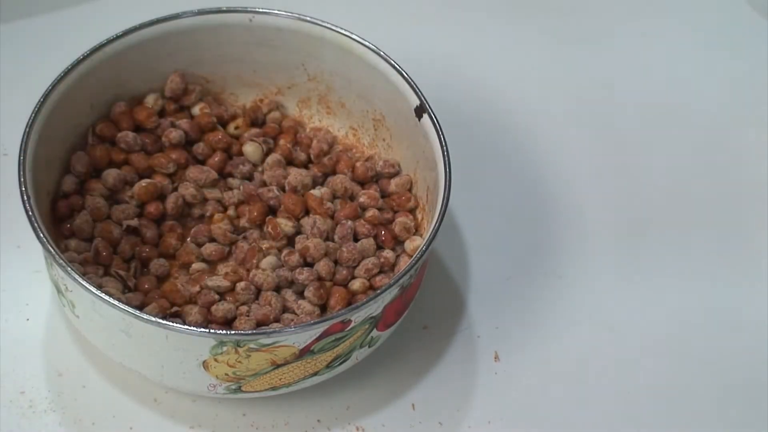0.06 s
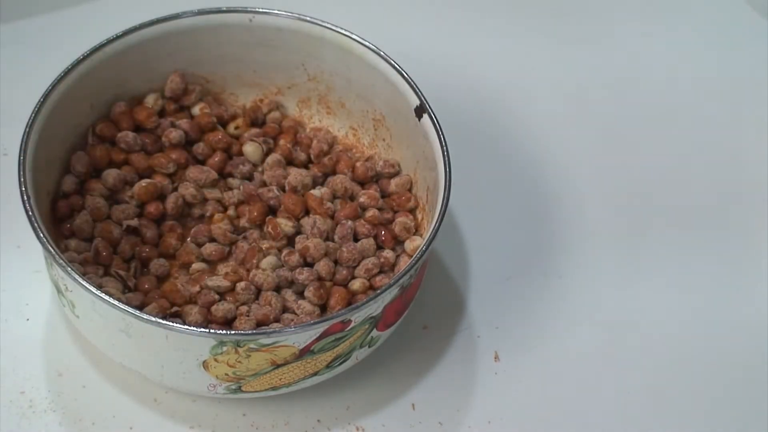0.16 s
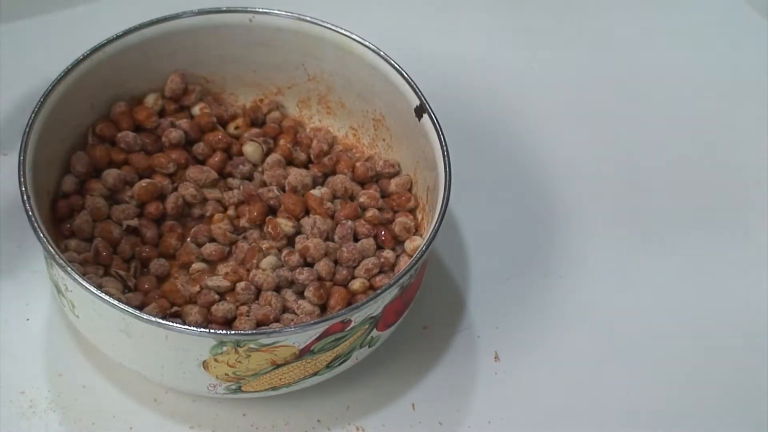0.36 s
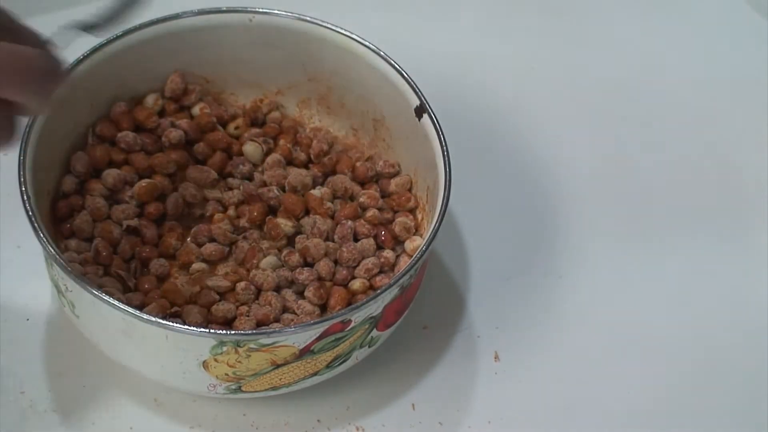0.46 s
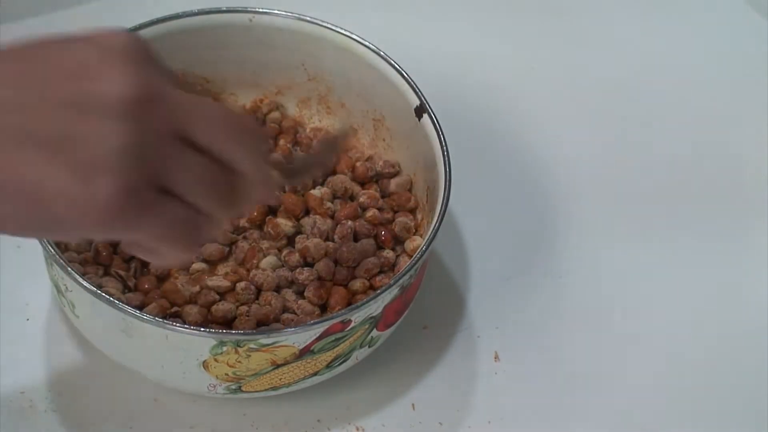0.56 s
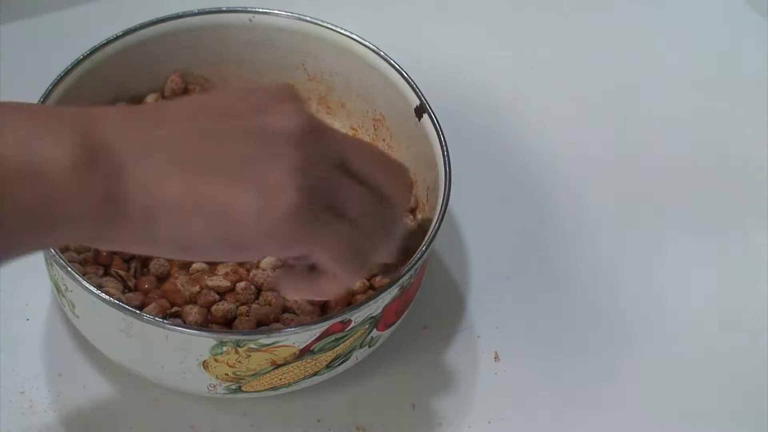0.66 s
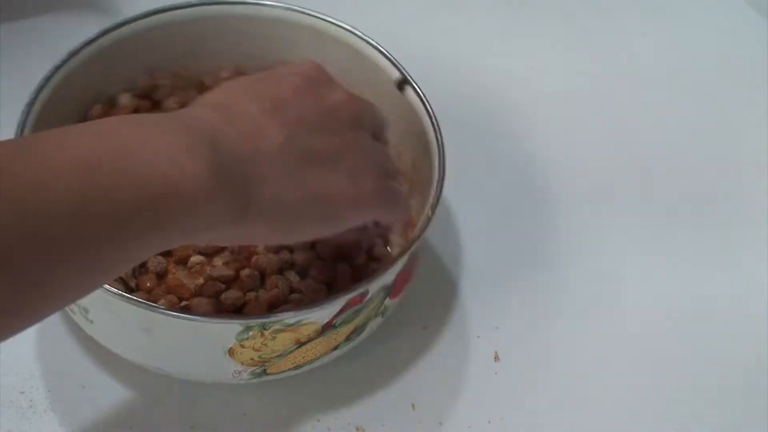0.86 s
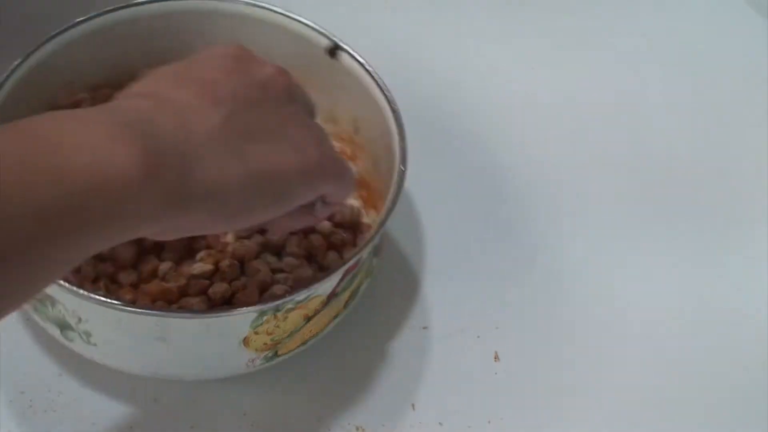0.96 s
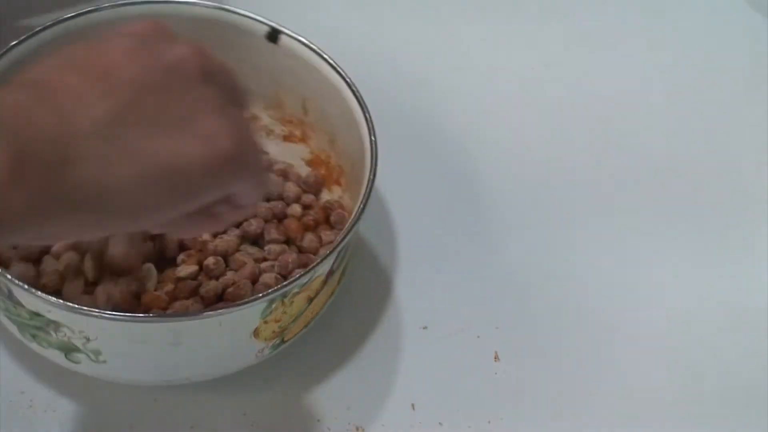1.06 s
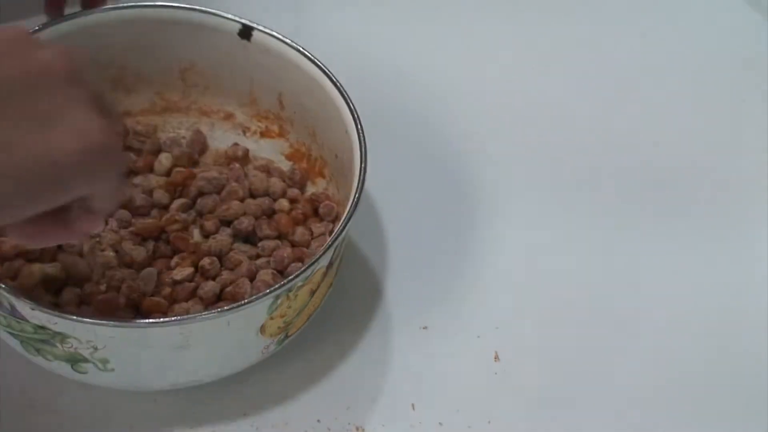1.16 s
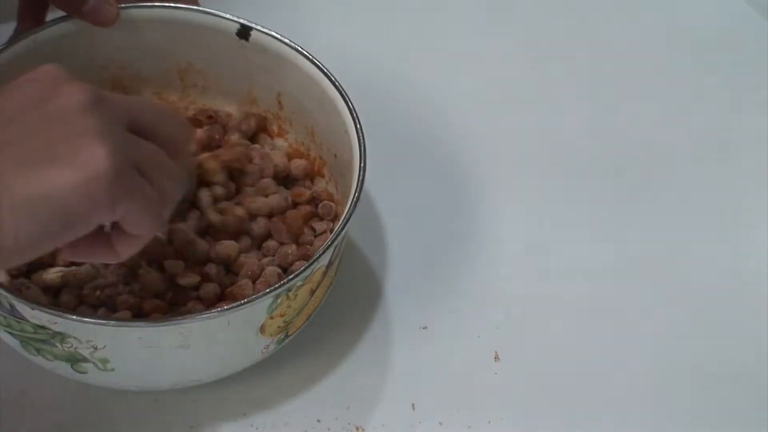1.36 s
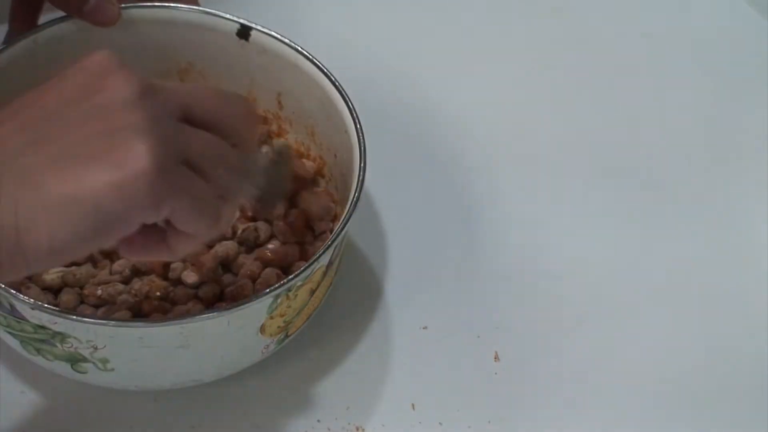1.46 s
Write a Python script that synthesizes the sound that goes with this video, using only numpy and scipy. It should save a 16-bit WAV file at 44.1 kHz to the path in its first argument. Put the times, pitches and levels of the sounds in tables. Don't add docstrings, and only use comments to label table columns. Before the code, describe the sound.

Coated peanuts are stirred in an enamel bowl with crunchy scrapes and small ticks, after a quick flurry of steel cutlery clinks and a loud wooden knock that bounces; small quiet kitchen, close stereo microphones.

```python
import sys
import numpy as np
from scipy import signal
from scipy.fft import rfft, irfft, next_fast_len
from scipy.io import wavfile
from scipy.ndimage import uniform_filter1d, map_coordinates

SR = 44100
rng = np.random.default_rng(int(sys.argv[2]) if len(sys.argv) > 2 else 0)


def wrap_up_sound(samples):
    columns = np.atleast_2d(samples).T
    tamed = np.clip(columns, -1, 1)
    steps = np.round(tamed * 32767).astype(np.int16)
    wavfile.write(sys.argv[1], SR, steps)


def makeup_ratio(level_db):
    decades = np.asarray(level_db, float) / 20
    return 10 ** decades


N = 66150
T = np.arange(N) / SR
LEAD = 4096


def noise(shape=N):
    return rng.standard_normal(shape)


def unit(x):
    return x / np.sqrt(np.mean(x ** 2) + 1e-20)


def along(points, hz):
    f, v = np.transpose(points)
    return np.interp(np.log(hz + 1), np.log(f + 1), v)


def filtered(x, response):
    n = x.shape[-1]
    m = next_fast_len(n + SR // 4)
    return irfft(rfft(x, m) * response(np.fft.rfftfreq(m, 1 / SR)), m)[..., :n]


def causal(points, tilt_db=0):
    def response(hz):
        level_db = along(points, hz) + tilt_db * np.log2((hz + 200) / 1200)
        c = irfft(np.log(makeup_ratio(level_db) + 1e-6))
        c[1:len(c) // 2] *= 2
        c[len(c) // 2 + 1:] = 0
        return np.exp(rfft(c))
    return response


def peaks(rows):
    def response(f):
        total = 0
        for k, (c, w, db) in enumerate(rows):
            total = total + (-1) ** k * makeup_ratio(db) * 1j * f * w / (c * c - f * f + 1j * f * w + 1e-9)
        return response_type(total)
    response_type = np.asarray
    return response


def wobble(rate):
    return map_coordinates(noise(2000), [np.arange(N) * rate / SR])


def grains(rate, spread_db):
    chance, sign, size = rng.random((3, N))
    return (chance < rate / SR) * np.sign(sign - .5) * makeup_ratio(-spread_db * np.log(size + 0.00099))


def add(track, s, x):
    part = track[..., max(round(s * SR) + LEAD, 0):][..., :x.shape[-1]]
    part += x[..., :part.shape[-1]]


# (frequency [Hz], level [dB])
FLOOR_COLOUR = [(30, -26), (100, -14), (300, -4), (1500, -9.5), (2100, -15), (4800, -23.5), (15700, -35)]


def quiet_kitchen():
    return makeup_ratio(-60.5) * unit(filtered(noise((2, N)), lambda f: makeup_ratio(along(FLOOR_COLOUR, f))))


# (frequency [Hz], time to fall 60 dB [s])
ROOM_DECAY = [(100, 0.37), (400, 0.27), (1500, 0.38), (4000, 0.27), (10000, 0.14)]


def room(x):
    hz, t, z = signal.stft(noise((2, SR // 2)), SR, nperseg=256)
    fade = makeup_ratio(-60 * t / along(ROOM_DECAY, hz)[:, None])
    tail = signal.istft(z * fade, SR, nperseg=256)[1]
    tail = np.pad(tail / np.linalg.norm(tail[0]), ((0, 0), (150, 0)))
    return signal.fftconvolve(x[None], tail * [[1], [.8]], axes=1)


def with_room(x, room_db):
    out = makeup_ratio(room_db) * room(x)
    out[0, :len(x)] += x
    return out


# (frequency [Hz], level [dB])
JANGLE_COLOUR = [(710, -60.5), (1200, -41.5), (1780, -16.5), (2010, -16.5), (2330, -8.5), (2650, -14),
                 (4980, -16), (5790, -21.5), (15500, -42.5)]


def clink(modes, s, db, jangle_db, tilt_db, out):
    fuzz_hz, partner, jangle_t60 = 22.5, 0.00814, 0.086
    t = np.arange(SR // 2) / SR
    hz, level_db, t60 = np.transpose(modes)[:, :, None]
    steps = uniform_filter1d(noise((2, len(modes), len(t))), size=60, axis=-1)
    drift = np.cumsum(steps, -1) * np.sqrt(2 * np.pi * fuzz_hz * (hz + 1200) / 7000 / SR)
    pair = np.sin(2 * np.pi * hz * t + drift[0])
    pair = pair + 0.77 * np.sin(2 * np.pi * hz * (1 + partner) * t + drift[1])
    ring = (makeup_ratio(level_db - 60 * t / t60) * pair).sum(0)
    jangle = unit(filtered(noise(len(t)), causal(JANGLE_COLOUR, tilt_db)))
    jangle = jangle * makeup_ratio(jangle_db - 60 * t / jangle_t60)
    rise_s = 0.02 if jangle_db < -15 else .0006
    touch = makeup_ratio(db - 10.5) * (ring + jangle) * (1 - np.exp(-t / rise_s))
    add(out, s, with_room(touch, -7))


# (frequency [Hz], level [dB], time to fall 60 dB [s])
SERVER_MODES = [(2260, -4.5, 0.39), (3360, -8.5, .3), (3860, -13, 0.24), (3880, -8, 0.27), (5420, -9, 0.17),
                (5744, -2.5, 0.35), (6430, -7.5, 0.26), (10360, -18, 0.13)]
TEASPOON_MODES = [(4520, -5.5, 0.15), (5755, -0.5, 0.18), (8300, -9, 0.14), (9000, 0.5, 0.091),
                  (12168, -12, .06), (12700, -11.5, 0.123)]
FORK_MODES = [(1827, -0.5, 0.27), (2287, -12, 0.25), (3007, -11, 0.18), (3430, -12.5, 0.09),
              (3730, -16.5, 0.22), (5630, -2.5, 0.077), (5737, -4, 0.22), (6010, -2, 0.061),
              (6590, -0.5, 0.11), (10140, -20.5, 0.34), (12170, -22.5, .15), (12880, -21, 0.097)]
KNIFE_MODES = [(2325, -3, 0.25), (3100, -8, 0.11), (3620, -10, .5), (3800, -9, 0.11), (4520, -18.5, 0.1),
               (5560, -16, 0.17), (5670, -6, 0.42), (6180, -4, 0.24), (6420, -6.5, 0.37), (8200, -19, 0.11),
               (10300, -18, 0.08), (11200, -18.5, 0.14)]
# (time [s], peak level [dB], jangle [dB], jangle brightness [dB per octave])
SERVER_TOUCHES = [
    (-.02, -26.5, 5.5, -1),
    (.02, -35.5, 5.4, -.5),
    (.048, -41.5, 6.1, -.5),
]
TEASPOON_TOUCHES = [
    (0.083, -38, -21.5, 3),
    (0.0929, -38.5, -9.5, 3.3),
    (0.0993, -31, -13.5, 3.3),
    (0.1069, -38.5, -12, 2.7),
    (.127, -30, -4.5, 2.1),
]
FORK_TOUCHES = [
    (0.1349, -14.5, -5, 0.86),
    (.14, -26.5, 4.5, 1),
    (.148, -29, 2, .1),
    (0.16, -32.5, 5.5, .1),
    (0.167, -27, 2.5, .1),
]
KNIFE_TOUCHES = [
    (0.2112, -21, -0.5, 1.5),
    (.2205, -27.5, 3.5, 0.5),
    (0.2613, -23, -1.5, 1.5),
]


def cutlery():
    out = np.zeros((2, N + LEAD))
    pieces = [(SERVER_MODES, SERVER_TOUCHES), (TEASPOON_MODES, TEASPOON_TOUCHES),
              (FORK_MODES, FORK_TOUCHES), (KNIFE_MODES, KNIFE_TOUCHES)]
    for modes, touches in pieces:
        for touch in touches:
            clink(modes, *touch, out)
    return filtered(out, lambda f: (1j * f / (1j * f + 790)) ** 4)[:, LEAD:]


def snap(hz, t):
    return np.sin(2 * np.pi * hz * t) * (hz * t) * np.exp(1 - hz * t) * np.exp(-hz * t / 4)


def stopping(t, end_s, fade_s):
    return makeup_ratio(-60 * np.maximum(t - end_s, 0) / fade_s)


# (frequency [Hz], level [dB])
WOOD_COLOUR = [(35, -95.5), (80, -32.5), (360, -7), (1080, -6), (1610, -6), (1910, -8), (2070, -9),
               (6440, -44), (9000, -81), (11700, -63), (19800, -120)]
# (frequency [Hz], level [dB], time to fall 60 dB [s])
BOARD_MODES = [(220, -2.5, 0.1), (428, -16.5, 0.037), (684, -7.5, 0.085), (1190, -15, 0.058),
               (1312, -14, 0.07), (1500, -18.5, .08), (1608, -6.5, 0.072), (2070, -15, 0.077),
               (2790, -10, 0.019)]
# (time [s], snap peak [dB], snap frequency [Hz], narrowing about it [dB per octave squared],
#  rattle lasts [s])
WOOD_KNOCKS = [
    (0.2857, -0.5, 3450, 0.46, 0.12),
    (0.4291, -14, 907, 1.0, 0.093),
    (0.4344, -21, 877, 1.5, 0.071),
    (0.4436, -20, 666, 3, 0.08),
]


def knocks():
    out, t = np.zeros((2, N + LEAD)), np.arange(SR // 4) / SR
    for s, db, hz, narrow_db, last_s in WOOD_KNOCKS:
        clunk = makeup_ratio(-16) * stopping(t, 0.013, 0.022)
        rattle = makeup_ratio(-23.5 - 60 * t) * stopping(t, last_s, 0.065)
        shape = (clunk + rattle) * (1 - np.exp(-t / 0.00049))
        colour = [(f, level_db - narrow_db * np.log2(f / hz) ** 2) for f, level_db in WOOD_COLOUR]
        body = unit(filtered(noise(len(t)), causal(colour))) * shape
        ring = 0
        for f, level_db, t60 in BOARD_MODES:
            mode_db = -11 + level_db - narrow_db * np.log2(f / hz) ** 2
            ring = ring + makeup_ratio(mode_db - 60 * t / t60) * np.sin(2 * np.pi * (f * t + rng.random()))
        body = body + ring * (1 - np.exp(-t / 0.003))
        thud = makeup_ratio(-7.5 - 2.8 * narrow_db) * np.roll(snap(390, t), 20)
        add(out, s, makeup_ratio(db) * with_room(snap(hz, t) + thud + body, -7))
    return out[:, LEAD:]


def patchy(x, depth_db):
    z = signal.stft(x, nperseg=256)[2]
    field = uniform_filter1d(noise(z.shape), size=3, axis=0)
    field = uniform_filter1d(field, size=8, axis=1)
    return unit(signal.istft(z * makeup_ratio(depth_db * unit(field)), nperseg=256)[1][:N])


def steady(x):
    x = unit(x)
    return unit(x / (np.abs(uniform_filter1d(x ** 2, size=1500)) + .02) ** 0.38)


def table_rumble(slips, rows):
    total = 0
    for c, w, db in rows:
        total = total + makeup_ratio(db) * steady(filtered(slips, lambda f: peaks([(c, w, 0)])(f) ** 2))
    return unit(total)


def follow(rows):
    return makeup_ratio(np.interp(T, *np.vstack(rows).T[:2], left=-120))


# (frequency [Hz], level [dB])
CRUST_COLOUR = [(1000, -54.5), (3000, -16.5), (5000, -3.5), (6500, 1.2), (9000, -1.5), (12500, -3.5),
                (15700, -18.5)]
NUT_COLOUR = [(500, -22.5), (800, -11.5), (1200, -15.5), (2100, -4), (3000, -6), (5000, -8.5), (9000, -19),
              (15000, -48.5)]
# (frequency [Hz], width [Hz], level [dB])
TABLE_LIGHT = [(289.2, 45, 0), (361, 64, -1.5), (506, 160, -16), (757, 140, -18.5)]
TABLE_LOADED = [(131, 102, -11), (192, 89, 0)]
SPOON_MODES = [(6520, 110, 3.5), (6860, 140, 4.5), (8250, 185, -4), (9500, 164, -1), (10300, 82, -1),
               (11900, 110, -2.5)]
# (time [s], level [dB])
SPOON_PRESSURE = [(.735, -84.5), (.755, -55), (.86, -47.5), (.915, -41.5), (.94, -42.5), (.99, -33),
                  (1.06, -40.5), (1.165, -47), (1.21, -70), (1.245, -62), (1.256, -42.5), (1.282, -57),
                  (1.308, -33), (1.33, -38.5), (1.41, -48.5), (1.445, -79), (1.5, -71)]
# (time [s], level [dB])
NUT_TUMBLE = [(.74, -73), (.87, -62.5), (0.899, -49), (0.963, -39.5), (1.05, -39.5), (1.15, -50),
              (1.21, -63.5), (1.28, -64), (1.311, -46), (1.35, -51), (1.4, -56), (1.5, -72)]
# (time [s], level [dB], heavy share [0-1])
BOWL_DRAG = [(.732, -83, 0.93), (.742, -49.5, 1), (.8, -53.5, 0.35), (.83, -49.5, 0.1), (.9, -43.5, 0.27),
             (.935, -48, 0.54), (.96, -34.5, 0.1), (1.09, -38.5, 0.12), (1.115, -51, 0.12),
             (1.19, -51.5, 0.2), (1.21, -61, 0.6), (1.228, -54, 0.6), (1.24, -40.5, 0.96),
             (1.29, -49, 0.99), (1.33, -57, 0.87), (1.4, -58.5, 0.43), (1.5, -67.5, 0.11)]


def stirring():
    crust = filtered(unit(grains(3300, 3.0)) + 1.3 * noise(), causal(CRUST_COLOUR))
    crust = patchy(crust, depth_db=3.0) * makeup_ratio(-1.5 + 0.4 * wobble(40))
    nuts = filtered(unit(grains(1500, 1.2)) + .9 * noise(), causal(NUT_COLOUR))
    nuts = patchy(nuts, depth_db=2.5) * makeup_ratio(1.4 + 0.32 * wobble(44.0))

    slips = unit(grains(260, 1.9)) + 0.55 * noise()
    heavy = np.clip(np.interp(T, *np.transpose(BOWL_DRAG)[::2]), 0, 1)
    rumble = np.sqrt(1 - heavy) * table_rumble(slips, TABLE_LIGHT)
    rumble = rumble + np.sqrt(heavy) * table_rumble(slips, TABLE_LOADED)
    rumble = rumble * makeup_ratio(2.37 * wobble(60))

    u = T - .739
    sing = (u > 0) * (1 - np.exp(-np.abs(u) / 0.0087)) * makeup_ratio(-43 - 60 * np.maximum(u - 0.028, 0) / 0.21)
    sing = sing * unit(filtered(noise(), peaks(SPOON_MODES)))
    return follow(SPOON_PRESSURE) * crust + follow(NUT_TUMBLE) * nuts + follow(BOWL_DRAG) * rumble + sing


# (time [s], peak level [dB], ring frequency [Hz], bright share [dB])
NUT_TICKS = [(0.8321, -48, 2950, 0), (0.889, -42, 5340, -5), (0.9108, -33.5, 1500, 4),
             (0.914, -31, 3100, -2.5), (.919, -33.5, 1930, -7), (.938, -34.5, 1500, -7),
             (.9735, -32.5, 3600, -9), (0.9873, -24.5, 2200, 7), (0.9874, -23.5, 4800, -8.5),
             (1.009, -30.5, 5900, -5.5), (1.038, -29, 1980, -16), (1.083, -36, 2770, -7.5),
             (1.2503, -32.5, 2240, -5.5), (1.2581, -34.5, 9000, 5), (1.2945, -32, 3570, -23),
             (1.2975, -35, 3720, -7), (1.2938, -36, 4960, -20), (1.3036, -33.5, 4400, 7),
             (1.3054, -27.5, 8800, -2), (1.312, -35, 2820, 3.5), (1.3145, -33, 2700, -3),
             (1.3675, -39, 4940, -1.5), (1.374, -42, 5550, -1), (1.346, -41.5, 5160, -1.5),
             (1.228, -44, 7200, -22), (1.326, -51, 1980, -7), (1.408, -32.5, 1500, -15.5),
             (1.4082, -37.5, 684, -20), (1.4083, -34, 3950, -20), (1.4085, -31.5, 5800, -24),
             (1.408, -35, 7900, -20), (1.4555, -40.5, 726, -20), (1.455, -37, 4150, -14.5)]


def ticks():
    out, t = np.zeros(N + LEAD), np.arange(SR // 30) / SR
    for s, db, hz, bright_db in NUT_TICKS:
        nut = peaks([(hz, 0.28 * (hz + 1800) / 2, 0)])
        ring = filtered((noise(len(t)) + 4 * (t == 0)) * makeup_ratio(-60 * t / 0.0061), lambda f: nut(f) ** 2)
        click = filtered((noise(len(t)) + 7 * (t == 0)) * makeup_ratio(-60 * t / .012), causal(CRUST_COLOUR))
        click = makeup_ratio(bright_db) * click / np.abs(click).max()
        add(out, s, makeup_ratio(db) * (ring / np.abs(ring).max() + click))
    return out[LEAD:]


def spread(x, width):
    t = np.arange(400)
    scatter = noise(400) * np.exp(-t / 60)
    return np.array([x, width * signal.fftconvolve(x, scatter / np.linalg.norm(scatter))[:N]])


# (frequency [Hz], likeness [0-1])
LIKENESS = [(100, 0.97), (1500, 0.82), (6000, 0.81), (9000, 0.41), (12500, 0.91)]
# (frequency [Hz], left over right [dB])
LEFT_OVER_RIGHT = [(200, 3.5), (1000, 3.5), (3000, 0.2), (9000, 2.5), (13000, 2.9)]


def two_microphones(mid, side):
    side = filtered(side, lambda f: 2.39 * np.tan(np.arccos(np.clip(along(LIKENESS, f), 0, 1)) / 2))
    halves = np.array([[.5], [-.5]])
    return filtered(np.array([mid + side, mid - side]), lambda f: makeup_ratio(along(LEFT_OVER_RIGHT, f) * halves))


def scene():
    floor = quiet_kitchen()
    bowl = stirring() + ticks()
    near_bowl = spread(bowl, 0.25) + makeup_ratio(-9.0) * room(bowl)[:, :N]
    mid, side = cutlery() + knocks() + near_bowl + floor
    return two_microphones(mid, side)


def top_cut(x):
    return signal.sosfilt(signal.butter(12, 15870, fs=SR, output="sos"), x)


def record(dry):
    mix = filtered(dry, lambda hz: (hz < 15870) * (1j * hz / (1j * hz + 56.5)) ** 3)
    return top_cut(mix)


dry = scene()
out = record(dry)
wrap_up_sound(out)
```